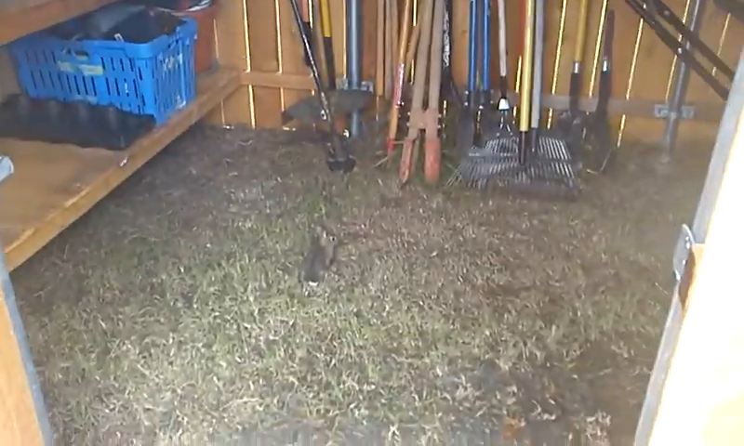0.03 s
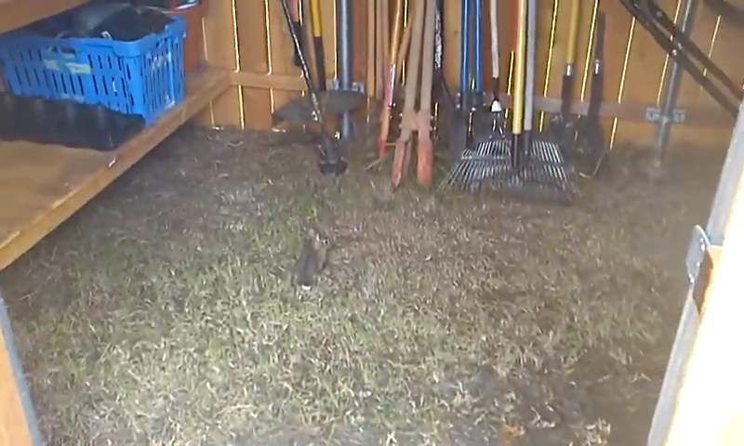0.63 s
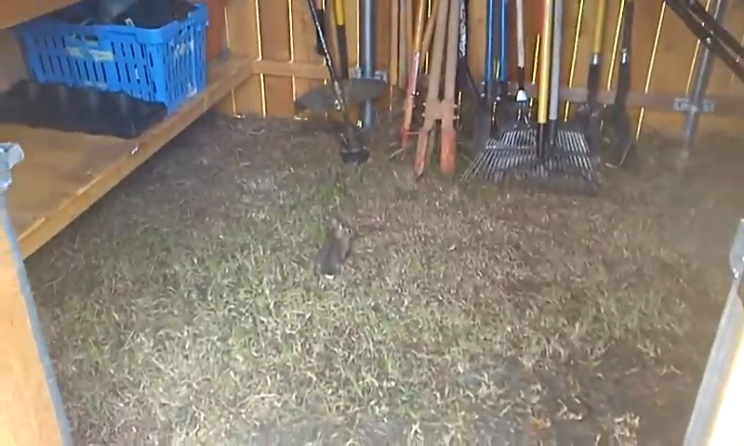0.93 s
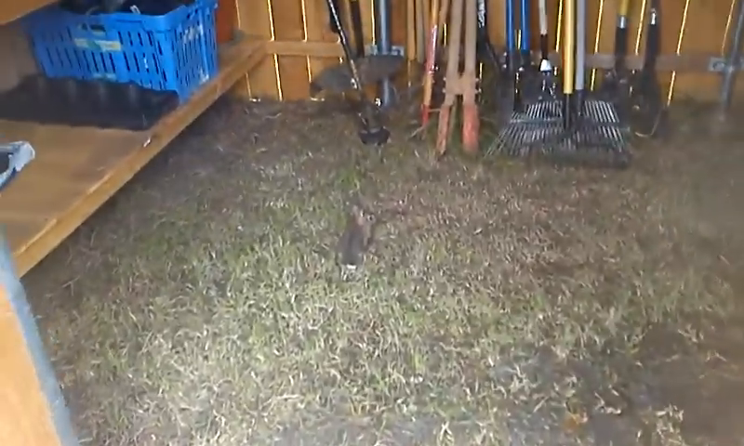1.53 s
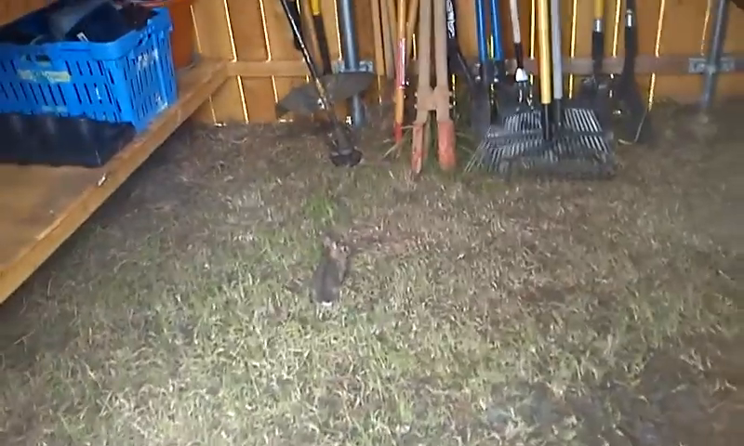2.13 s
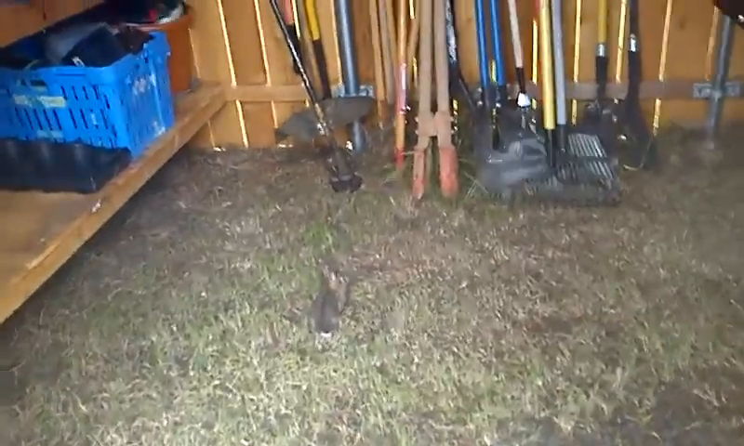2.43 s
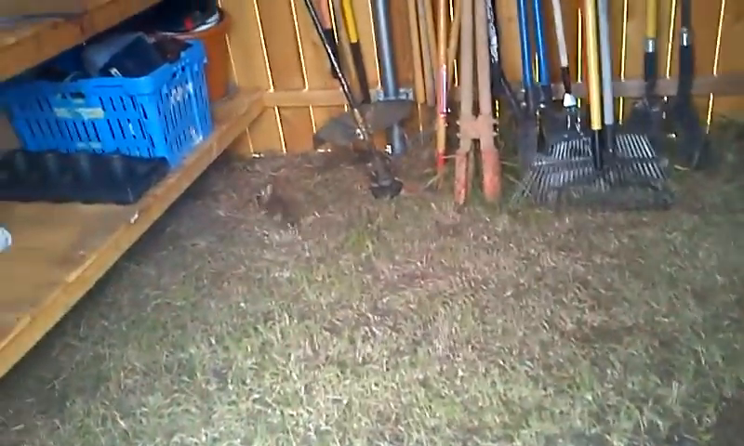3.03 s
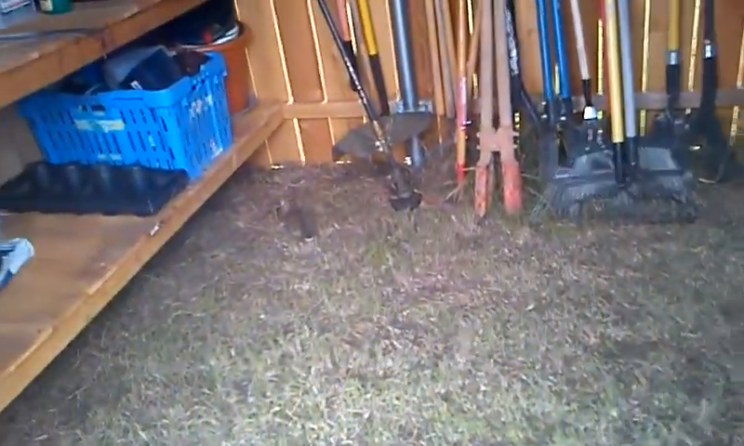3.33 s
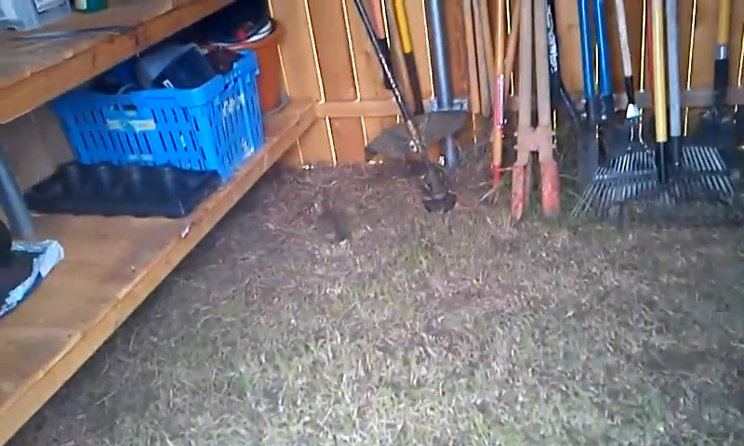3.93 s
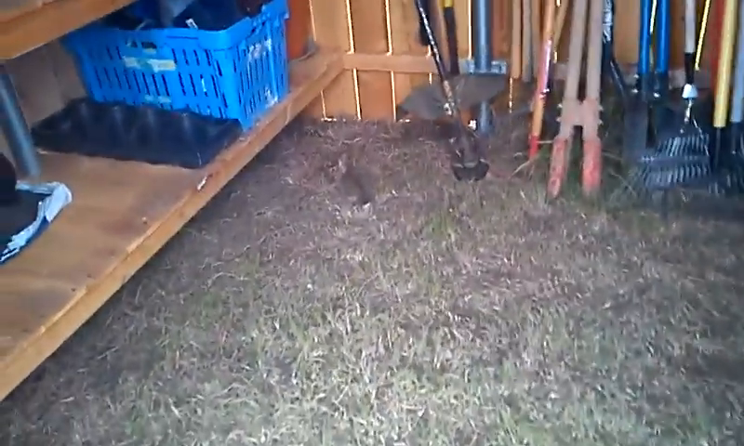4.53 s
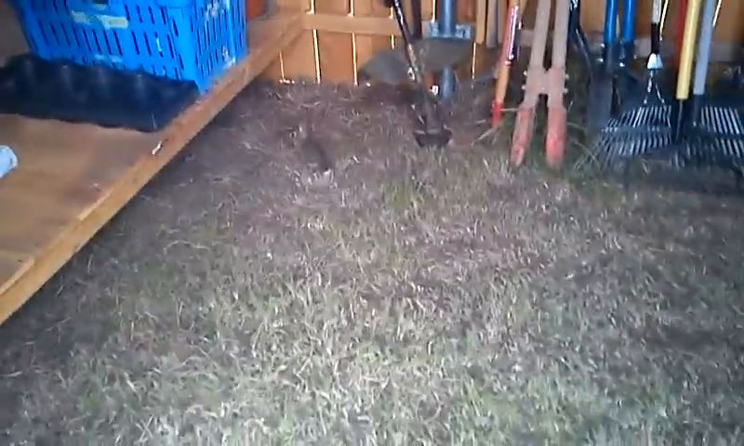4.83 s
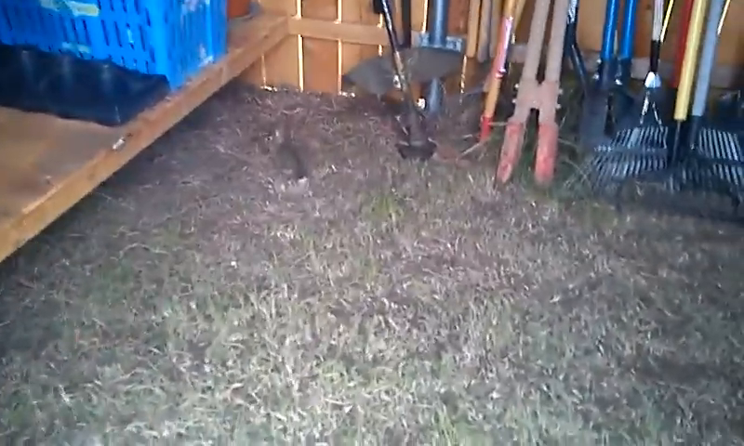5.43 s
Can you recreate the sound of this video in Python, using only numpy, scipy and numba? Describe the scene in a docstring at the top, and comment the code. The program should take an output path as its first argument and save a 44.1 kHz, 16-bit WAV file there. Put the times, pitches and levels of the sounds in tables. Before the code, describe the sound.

At the open door of a garden shed, wind and handling thump on the microphone while something rubs and clicks close by, with one sharp snap. The buffeting eases and hollow wood is tapped lightly. A bird outside then whistles five pairs of short husky notes, the first level and the second falling. Other birds chirp further off, and a faint creak passes over a low distant rumble.

```python
"""At the open door of a garden shed: air and handling buffet the microphone, something rubs and clicks
close by, a small hard part snaps sharply and hollow wood is tapped. Then a bird outside whistles pairs
of short low notes, level then falling, while other birds chirp further off and something under strain
creaks faintly. Trees and walls smear the calls over a low distant rumble."""
import sys
import numpy as np
from scipy import signal
from scipy.fft import rfft, irfft
from scipy.io import wavfile
from numba import njit

SR = 44100
rng = np.random.default_rng(int(sys.argv[2]) if len(sys.argv) > 2 else 0)


def transcribe(signal):
    """Save signal, clipped to [-1, 1], as a 16-bit WAV file at the path in sys.argv[1]."""
    frames = np.atleast_2d(signal).T
    limited = np.clip(frames, -1, 1)
    pcm = np.round(limited * 32767).astype(np.int16)
    wavfile.write(sys.argv[1], SR, pcm)


N = 250929
T = np.arange(N) / SR


def undb(db):
    """Decibels to gain."""
    return 10 ** (np.asarray(db) / 20)


def unit(x):
    """Scale to rms 1."""
    return x / np.sqrt(np.mean(x ** 2))


def curves(rows):
    """Linear curves over time, one per column after the first."""
    times_s, *columns = np.transpose(rows)
    return [np.interp(T, times_s, column) for column in columns]


def add(out, start_s, x):
    """Mix x into out at start_s."""
    i = max(int(round(start_s * SR)), 0)
    out[i:i + len(x)] += x[:N - i]


def coloured(spectrum):
    """Noise of rms 1, shaped by rows of freq_hz, gain_db."""
    hz, db = np.transpose(spectrum)
    bins_hz = np.maximum(np.fft.rfftfreq(N, 1 / SR), 1)
    gain = undb(np.interp(np.log(bins_hz), np.log(hz), db))
    return unit(irfft(rfft(rng.standard_normal(N)) * gain, N))


def walk(rate_hz):
    """Random curve of spread near 1, with rate_hz new values a second."""
    return np.interp(T * rate_hz, np.arange(N), rng.standard_normal(N))


def fade(t, t60_s):
    """Exponential decay, 60 dB down at t60_s."""
    return np.exp(-np.log(1000) * t / t60_s)


def swell(start_s, length_s, attack_s, t60_s):
    """Envelope: rise, hold to the end of length_s, decay."""
    return np.clip((T - start_s) / attack_s, 0, 1) * fade(np.maximum(T - start_s - length_s, 0), t60_s)


@njit
def svf(x, hz, width_hz):
    """State-variable band-pass; centre and width per sample."""
    y, band_state, low_state = np.empty(len(x)), 0., 0.
    for i in range(len(x)):
        g, damping = np.tan(np.pi * hz[i] / SR), width_hz[i] / hz[i]
        v = (band_state + g * (x[i] - low_state)) / (1 + g * (g + damping))
        band_state, low_state = 2 * v - band_state, low_state + 2 * g * v
        y[i] = damping * v
    return y


def resonance(x, hz, width_hz):
    """Band-pass, gain 1 at its centre."""
    ones = np.ones(len(x))
    return svf(x, np.clip(hz, 20, SR / 3) * ones, width_hz * ones)


def band(x, hz, width_hz):
    """Two resonances in series, scaled to rms 1."""
    return unit(resonance(resonance(x, hz, width_hz), hz, width_hz))


def background():
    """Wavering far rumble and open-air hiss, the microphone's own noise, a faint thin whine."""
    # outdoor spectrum: freq_hz, gain_db
    air_colour = [(20, -4.5), (50, -4.5), (92, 2), (130, -7), (170, -8.5), (240, -17.5), (310, -19),
                  (400, -21), (600, -21.5), (1200, -25.5), (2000, -28), (2900, -30.5), (3700, -31),
                  (5200, -36), (6500, -42), (8500, -43.5), (10500, -54), (16000, -40)]
    # microphone hiss spectrum: freq_hz, gain_db
    mic_colour = [(20, -59), (10000, -7), (11300, -13), (12600, 8), (15500, 0), (16000, -7)]
    air = coloured(air_colour)
    low = signal.sosfiltfilt(signal.butter(2, 500, fs=SR, output="sos"), air)
    rumble = unit(low) * undb(-48.5 + 0.8 * walk(9))
    hiss = unit(air - low) * undb(-61 + 0.4 * walk(12))
    whine = undb(-82) * band(rng.standard_normal(N), hz=6460, width_hz=196)
    return rumble + hiss + undb(-83) * coloured(mic_colour) + whine


def creak():
    """Stick-slip under slow strain: uneven ticks through broad resonances."""
    # course of the creak: time_s, slips_per_s, level_db
    course = [(3.42, 126, -70), (3.52, 124, -71), (3.7, 138, -72), (3.86, 173, -73), (3.96, 150, -73),
              (4.1, 120, -67), (4.18, 130, -66), (4.3, 133, -82)]
    # resonances: centre_hz, width_hz, gain_db
    modes = [(2400, 2500, 4), (4180, 2600, 1.5), (6200, 2300, -9.5)]
    jitter, scatter_db = 0.18, 5.5
    slips_per_s, level_db = curves(course)
    slip_count = np.floor(np.cumsum(slips_per_s * np.exp(jitter * walk(60))) / SR)
    ticks = np.diff(slip_count, prepend=0) * undb(scatter_db * np.clip(rng.standard_normal(N), -2, 2))
    body = sum(undb(gain_db) * band(ticks, hz, width_hz) for hz, width_hz, gain_db in modes)
    return undb(level_db) * unit(body) * (T > course[0][0]) * (T < course[-1][0])


def whistle(length_s, start_hz, end_hz, waver, trill_depth_hz=0):
    """One bird note: a wavering sine that slides, then settles; a trill shakes its pitch."""
    trill_rate_hz, jitter_rad, settle_power = 95.1, 1.84, 2.57
    t = T[:int(length_s * SR)]
    progress = t / length_s
    trill = np.sin(2 * np.pi * trill_rate_hz * t + jitter_rad * walk(90.2)[:len(t)])
    slide_hz = end_hz + (start_hz - end_hz) * (1 - progress) ** settle_power
    hz = slide_hz * (1 + waver * walk(139.4)[:len(t)]) + trill_depth_hz * trill
    envelope = np.sqrt(2) * np.sin(np.pi * progress) ** 0.4
    return envelope * np.sin(2 * np.pi * np.cumsum(hz) / SR)


def garden(x, wet_db, t60_s):
    """A call plus its soft, slightly late tail, scattered by trees and walls."""
    t, build_s = T[:SR], 0.015
    tail = rng.standard_normal(SR) * fade(t, t60_s) * (1 - np.exp(-t / build_s))
    return x + undb(wet_db) * signal.fftconvolve(x, tail / np.linalg.norm(tail))[:N]


def far_birds():
    """Chirps, buzzy trills and one longer thin whistle, rich in echo."""
    # chirps: start_s, length_s, start_hz, end_hz, relative_db, trill_depth_hz
    notes = [(1.947, 0.072, 4450, 4030, -63.5, 230), (1.995, 0.02, 2680, 2440, -62, 110),
             (2.162, 0.14, 6050, 6350, -74, 70), (2.663, 0.062, 3380, 3200, -64, 510),
             (2.841, 0.053, 5470, 5000, -67, 500), (2.859, 0.11, 2744, 3055, -63.5, 160),
             (2.895, 0.047, 3230, 3220, -56.5, 40), (2.96, 0.055, 3250, 3400, -64, 130),
             (3.357, 0.086, 6250, 6050, -74.5, 140), (4.219, 0.035, 3380, 3300, -62.5, 140),
             (4.243, 0.049, 3560, 3495, -59, 300), (4.268, 0.038, 3100, 3020, -61.5, 330),
             (4.348, 0.034, 3220, 3000, -67, 130), (4.572, 0.056, 4830, 4780, -62.5, 590),
             (4.7, 0.019, 1760, 1720, -60, 11)]
    chirps, thin = np.zeros(N), np.zeros(N)
    for start_s, length_s, start_hz, end_hz, relative_db, depth_hz in notes:
        note = whistle(length_s, start_hz, end_hz, waver=0.0154, trill_depth_hz=depth_hz)
        add(chirps, start_s, undb(relative_db) * note)
    add(thin, 2.132, undb(-74) * whistle(length_s=0.15, start_hz=2500, end_hz=2500, waver=0.0017))
    return undb(-2) * garden(chirps, wet_db=0, t60_s=0.41) + garden(thin, wet_db=3.5, t60_s=2.1)


def buffeting():
    """Lumpy gusts on the microphone over a fading draught; the hand bumps it softly."""
    # eddy spectrum: freq_hz, gain_db
    eddy_colour = [(20, -3), (50, 2), (120, -6), (200, -10), (330, -27.5), (500, -33.5), (1000, -47),
                   (2500, -60), (5000, -104), (9000, -131)]
    # smooth flow spectrum, duller: freq_hz, gain_db
    flow_colour = [(20, -3.5), (42, 2), (90, -2), (170, -25.5), (400, -33), (2000, -105)]
    # draught: time_s, level_db
    draught = [(0, -44.5), (1.75, -43), (2.2, -51), (3.2, -61.5), (5.69, -83)]
    # air puffs and handling rumble: start_s, length_s, gain_db, eddy_share
    gusts = [(0, 0.012, -35, 0.94), (0.036, 0.058, -40.5, .5), (0.139, 0.058, -34.5, 0.75),
             (0.204, 0.057, -34, 0.47), (0.266, 0.032, -35, 0.72), (0.331, 0.016, -34, 0.52),
             (0.36, 0.12, -30, 0.92), (.862, 0.029, -38.5, 0.98), (.9, 0.05, -38.5, 0.5),
             (0.946, 0.06, -35, 0.8), (1.015, 0.033, -32.5, 0.29), (1.08, 0.031, -29.5, 0.23),
             (1.138, 0.033, -37, 0.77), (1.182, 0.022, -33, 0.53), (1.305, 0.13, -40.5, 0.35),
             (1.61, 0.29, -43.5, 0.25), (2.392, 0.14, -43, 0), (2.945, 0.093, -45.5, 0.34),
             (3.647, 0.06, -45, 0.1)]
    # bumps on the microphone body, plus one short low thud (0.434 s) that gives the click at 0.433 s its wooden
    # body: centre_s, pitch_hz, length_s, level_db
    bumps = [(.008, 200, 0.019, -31.5), (.166, 129, 0.025, -29.5), (0.244, 60, 0.037, -27),
             (0.282, 221, 0.014, -36), (.342, 85, 0.026, -24.5), (0.372, 61.4, 0.034, -22.5),
             (0.412, 158, 0.012, -23), (0.434, 465, 0.0037, -26.5), (0.43, 70, 0.017, -20),
             (0.45, 252, 0.0095, -31), (.873, 207, 0.018, -34), (.958, 113, .03, -32),
             (1.03, 48, 0.042, -31), (1.159, 89.5, 0.018, -28.5), (1.516, 42, 0.055, -28),
             (2.945, 53.4, 0.045, -27), (3.66, 47, 0.033, -33.5), (5.349, 380, 0.015, -47),
             (5.352, 101, 0.022, -37)]
    lumps = undb(6.1 * np.tanh(walk(45.3)) + 1.5)
    eddies, flow = lumps * coloured(eddy_colour), coloured(flow_colour)
    out = undb(curves(draught)[0]) * coloured(flow_colour)
    for start_s, length_s, gain_db, eddy_share in gusts:
        air = eddy_share * eddies + np.sqrt(1 - eddy_share ** 2) * flow
        out += undb(gain_db) * swell(start_s, length_s, attack_s=0.0066, t60_s=0.068) * air
    for centre_s, pitch_hz, length_s, level_db in bumps:
        t = T[:int(length_s * SR)] - length_s / 2
        bump = np.cos(np.pi * t / length_s) ** 2 * np.sin(2 * np.pi * pitch_hz * t)
        add(out, centre_s - length_s / 2, undb(level_db) * bump)
    return out


def slips(per_s=3900):
    """Friction grit: random impulses of uneven, fluttering size."""
    sizes = rng.standard_normal(N) * undb(np.minimum(0.85 * rng.exponential(size=N), 8))
    return (rng.random(N) < per_s / SR) * sizes * undb(2 * walk(110))


def rustle():
    """Short rubs ring a gliding resonance and a weaker still one, over a dull body and airy sizzle."""
    # rubs: start_s, length_s, level_db, start_hz, end_hz, width_ratio, still_hz, still_db
    strokes = [(0.974, 0.076, -51.5, 1600, 1710, 1.25, 4300, -6),
               (1.078, 0.14, -63, 2700, 2600, 0.63, 5000, -22),
               (1.223, 0.055, -53, 2500, 2400, 0.74, 5000, -27),
               (1.345, 0.075, -52, 3080, 2980, 1.3, 5730, -11),
               (1.44, 0.072, -46.5, 3450, 3660, 0.45, 2600, -2.5),
               (1.523, 0.071, -54.5, 3220, 2680, 0.48, 5170, -7.5),
               (1.59, 0.048, -53, 1900, 1550, 0.35, 2740, -1), (2.672, 0.11, -67, 7000, 6900, 1, 8500, -14)]
    out = np.zeros(N)
    glide_grit, still_grit = slips(), slips()
    body = undb(-3) * band(slips(), hz=720, width_hz=2200)
    sizzle = undb(-19.5) * band(slips(per_s=1700), hz=8200, width_hz=1700)
    air = undb(-27) * band(slips(), hz=14000, width_hz=2900)
    for start_s, length_s, level_db, start_hz, end_hz, width_ratio, still_hz, still_db in strokes:
        hz = np.interp(T, [start_s, start_s + length_s], [start_hz, end_hz])
        glide = band(glide_grit, hz, width_ratio * hz)
        still = undb(still_db) * band(still_grit, still_hz, width_hz=1600)
        envelope = swell(start_s, length_s, attack_s=0.13 * length_s, t60_s=0.13)
        out += undb(level_db) * envelope * unit(glide + still + body + sizzle + air)
    return out


def clicks():
    """Small contacts: a bright tick, then a push and brief rattle through a broad resonance."""
    # contacts: start_s, strength_db, pitch_hz, width_hz, rattle_db, tick_db
    contacts = [(.4085, 4, 373, 695, -5, -61), (.4331, -0.5, 1810, 2600, -12, -54),
                (.5126, -26, 2400, 4500, 3.5, -40), (.5755, -22.5, 2210, 2500, -2, -39),
                (0.8197, -5.5, 645, 2700, -4.5, -32.5), (.8435, -12.5, 1670, 2600, 1.5, -42),
                (.975, -17, 1120, 2400, 10, -63), (.984, -13, 1390, 3000, 2, -31.5),
                (1.129, -21.5, 2900, 5000, -0.5, -34.5), (1.159, -11.5, 770, 1800, 2, -41),
                (1.2265, -25, 6140, 12100, -10, -21.5), (1.264, -21, 2780, 3500, -5, -33),
                (1.284, -21, 2800, 3500, -1, -36), (2.356, -22, 1800, 2600, -2, -46),
                (4.017, -23, 2400, 3000, -6, -40), (4.128, -22, 2000, 3000, -9, -47),
                (4.1363, -7, 2270, 2280, -9, -31), (5.3462, -12.5, 715, 2400, -1, -41)]
    out, t = np.zeros(N), T[:SR // 10]
    for start_s, strength_db, pitch_hz, width_hz, rattle_db, tick_db in contacts:
        rattle = rng.standard_normal(len(t)) * (fade(t, 0.026) + undb(-32) * fade(t, 0.055))
        blow = (t == 0) + undb(rattle_db) * rattle / np.linalg.norm(rattle)
        add(out, start_s, undb(tick_db) * resonance(blow, hz=8500, width_hz=2300))
        contact_s = 0.36 / pitch_hz  # lower pitch, longer push
        push = np.exp(-((t[:SR // 500] - contact_s) / (contact_s / np.pi)) ** 2)
        force = np.convolve(blow, push / push.sum())
        knock = resonance(resonance(force, pitch_hz, width_hz), pitch_hz, width_hz)
        add(out, start_s, undb(strength_db) * knock)
    return out


def struck(modes, start_s, strength_db):
    """A blow rings heavily damped modes; the shed's boards answer faintly."""
    out, t = np.zeros(N), T[:SR // 5]
    attack_s, echo_build_s, echo_db = 0.00008, 0.002, -10
    ring = sum(undb(gain_db) * fade(t, t60_s) * np.sin(2 * np.pi * hz * t) for hz, t60_s, gain_db in modes)
    ring *= 1 - np.exp(-t / attack_s)
    boards = rng.standard_normal(len(t)) * (fade(t, 0.024) + undb(-40) * fade(t, 0.23))
    boards *= 1 - np.exp(-t / echo_build_s)
    echo = signal.fftconvolve(ring, boards / np.linalg.norm(boards))[:len(t)]
    add(out, start_s, undb(strength_db) * (ring + undb(echo_db) * echo))
    return out


def tap():
    """One light tap on hollow wood."""
    # wood modes: pitch_hz, t60_s, gain_db
    modes = [(894, 0.044, 3), (1600, 0.023, 2.5), (1930, 0.022, 1), (2600, .02, -5)]
    return struck(modes, start_s=2.3548, strength_db=-47)


def snap():
    """One sharp snap of a small hard part."""
    # modes of the part: pitch_hz, t60_s, gain_db
    modes = [(129, 0.011, -1.5), (327, 0.0065, -22), (950, 0.0092, -16), (1330, 0.032, -22.5),
             (1480, 0.004, -14.5), (1900, 0.0045, -11), (2400, 0.0022, -7.5), (3340, 0.028, -29),
             (3730, 0.0034, 3.5), (4500, 0.0024, -11), (5680, 0.0044, -14.5), (6900, 0.0027, -33),
             (8400, .003, -22), (13200, 0.0018, -14)]
    return struck(modes, start_s=1.3549, strength_db=-7.5)


def near_bird():
    """Pairs of husky whistles, the first nearly level, the second falling; a wall repeats them."""
    # calls: start_s, first_length_s, delay_s, second_length_s, first_db, second_db,
    # pitch_hz, end_hz, wet_db, husk_db (levels relative)
    calls = [(2.384, 0.034, 0.13, 0.07, -59, -54.5, 1980, 1805, -10, -75),
             (2.714, 0.054, 0.13, 0.12, -56, -56, 1983, 1763, -8, -67),
             (4.265, 0.034, .13, 0.038, -63.5, -56.5, 2014, 1860, -1.5, -71),
             (4.592, 0.056, .146, 0.081, -55.5, -62, 2025, 1802, -3, -69.5),
             (4.989, 0.026, 0.14, 0.081, -56.5, -60.5, 2030, 1800, -2, -64)]
    flutter_db, flutter_hz = 3.5, 110
    wall_delay_s, wall_db = 0.062, -22
    out = np.zeros(N)
    for start_s, first_s, delay_s, second_s, first_db, second_db, hz, end_hz, wet_db, husk_db in calls:
        call = np.zeros(N)
        add(call, start_s, undb(first_db) * whistle(first_s, 1.025 * hz, hz, waver=0.0133))
        add(call, start_s + delay_s, undb(second_db) * whistle(second_s, 0.98 * hz, end_hz, waver=0.015))
        call *= undb(flutter_db * np.tanh(walk(flutter_hz)))
        call += undb(wall_db) * np.interp(T - wall_delay_s, T, call)
        husk = band(rng.standard_normal(N), 1.02 * hz, width_hz=1340)
        husk *= swell(start_s, delay_s + second_s, attack_s=0.01, t60_s=0.39)
        out += garden(call, wet_db, t60_s=0.69) + undb(husk_db) * husk
    return undb(-1.5) * out


def scene():
    """All sources at one microphone."""
    mix = snap() + tap() + near_bird() + far_birds() + clicks() + rustle() + creak()
    return (mix + buffeting() + background())[None]


def record(dry):
    """The recorder's steep low-pass."""
    cutoff_hz = 15900
    return signal.sosfilt(signal.ellip(10, 0.2, 70, cutoff_hz, fs=SR, output="sos"), dry)


dry = scene()
out = record(dry)
transcribe(out)
```